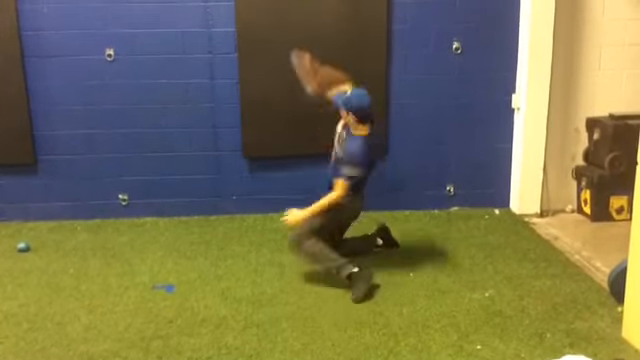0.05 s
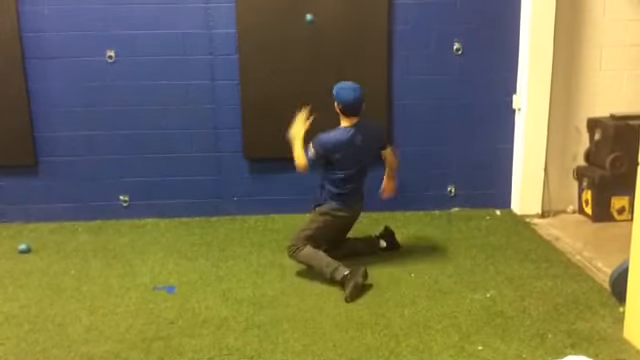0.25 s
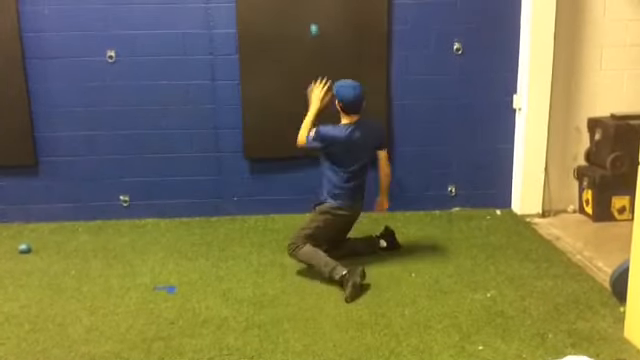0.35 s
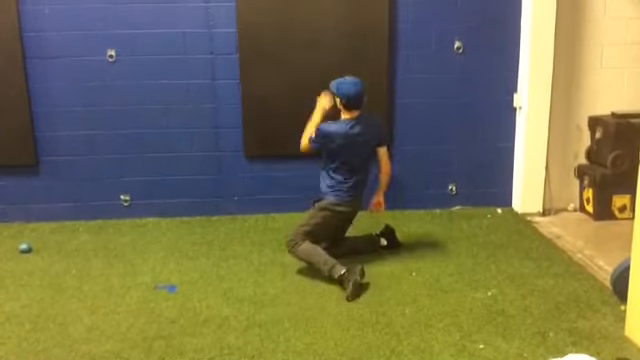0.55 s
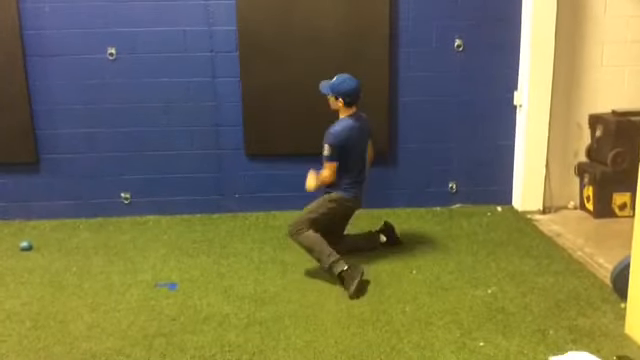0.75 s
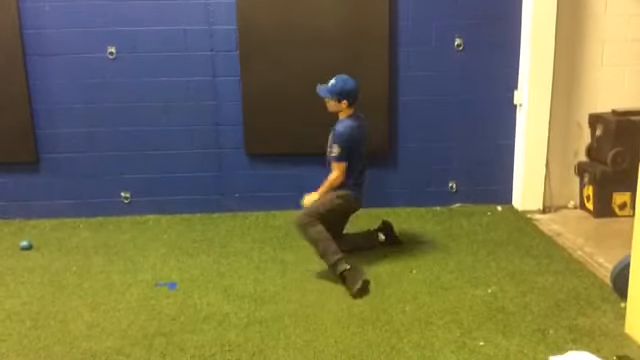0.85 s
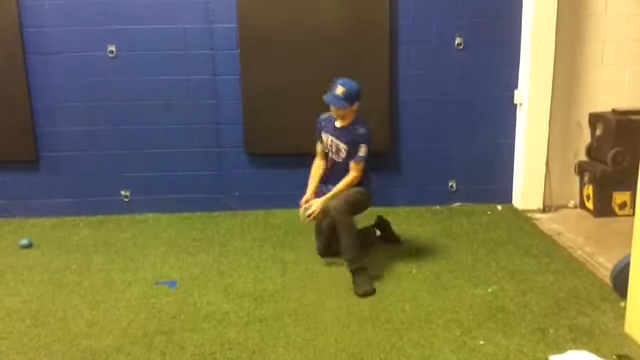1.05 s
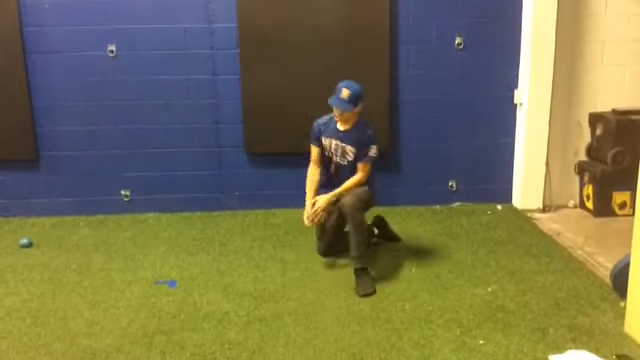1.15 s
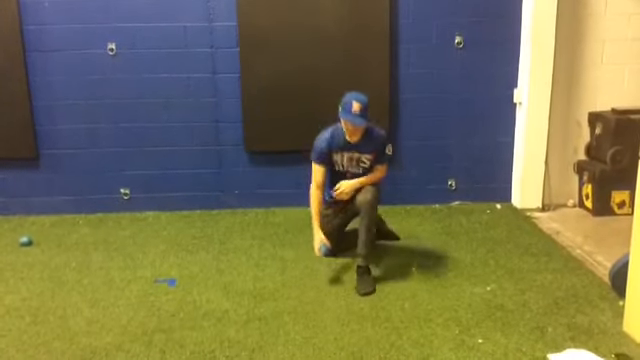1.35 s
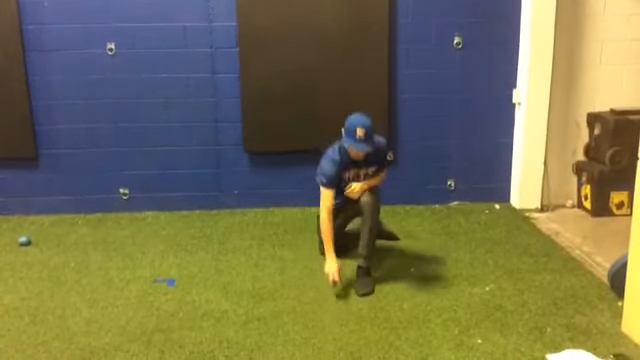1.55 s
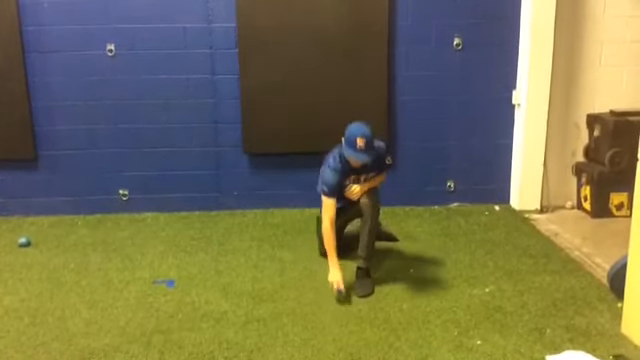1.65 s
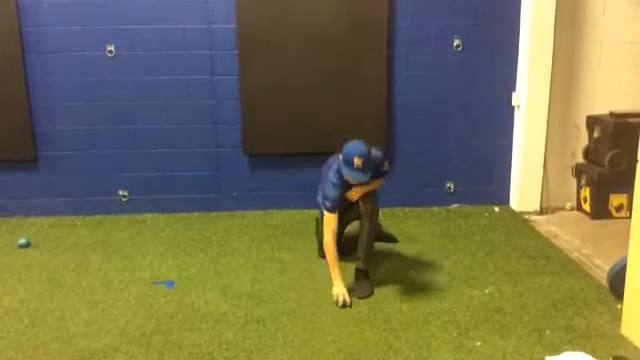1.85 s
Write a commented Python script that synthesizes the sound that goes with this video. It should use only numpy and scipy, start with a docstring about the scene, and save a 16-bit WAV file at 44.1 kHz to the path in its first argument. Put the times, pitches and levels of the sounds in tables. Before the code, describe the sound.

One sharp thud of a ball against a wall pad booms and dies away in an echoing training hall. Around it, the thrower's clothes rustle faintly and scuff on turf, with a small click over quiet ventilation rumble.

```python
"""Weighted ball against a wall pad

A thrown ball strikes a wall pad in an indoor training hall: the cover cracks, the pad's damped modes
thud, and the hall's standing waves boom. The crack reflects from the near walls, flutters along the
hall's length and dies away as reverberation. The kneeling thrower's clothes rustle and scuff on the
turf, with a few light clicks and faint squeaks, over a low ventilation rumble."""
import sys
import numpy as np
from scipy import signal
from scipy.fft import rfft, irfft
from scipy.io import wavfile
from scipy.ndimage import uniform_filter1d

SR = 44100
rng = np.random.default_rng(int(sys.argv[2]) if len(sys.argv) > 2 else 0)


def bounce(signal):
    """Save signal as a 16-bit WAV file at the path given by the first command-line argument."""
    frames = np.transpose(np.atleast_2d(signal))
    limited = np.clip(frames, -1, 1)
    pcm = np.round(limited * 32767).astype(np.int16)
    wavfile.write(sys.argv[1], SR, pcm)


N = 83790
TIME_S = np.arange(N) / SR


def gain(db):
    """Amplitude ratio of a level in decibels."""
    return 10 ** (np.asarray(db) / 20)


def unit_rms(x):
    """Normalisation to an rms of 1."""
    return x / np.sqrt(np.mean(x ** 2))


def decay(t60_s):
    """Exponential damping: 60 dB in t60_s."""
    return gain(-60 * TIME_S / t60_s)


def rise(time_constant_s):
    """First-order build-up towards 1."""
    return 1 - np.exp(-TIME_S / time_constant_s)


def delay(x, delay_s):
    """Pure time delay."""
    return np.concatenate([np.zeros(int(delay_s * SR)), x])[:N]


def per_bin(hz, values):
    """Interpolation over log frequency, one value per spectral bin."""
    return np.interp(np.log(np.arange(N // 2 + 1) * SR / N + 1), np.log(hz), values)


def response(spectrum):
    """Magnitude response through (frequency_hz, level_db) points."""
    hz, db = np.array(spectrum).T
    return gain(per_bin(hz, db))


def noise(spectrum):
    """Spectrally shaped white noise, at an rms of 1."""
    return unit_rms(irfft(rfft(rng.standard_normal(N)) * response(spectrum), N))


def band(x, hz, spread):
    """Band-pass filtering from hz / spread to hz * spread."""
    return signal.sosfilt(signal.butter(2, [hz / spread, hz * spread], "band", fs=SR, output="sos"), x)


def band_noise(hz, spread):
    """Band-limited noise, at an rms of 1."""
    return unit_rms(band(rng.standard_normal(N), hz, spread))


def swells(rows, spread):
    """Noise bands under Gaussian envelopes; width_s is the standard deviation."""
    return sum(gain(db) * np.exp(-.5 * ((TIME_S - peak_s) / width_s) ** 2) * band_noise(hz, spread)
               for peak_s, width_s, db, hz in rows)


def ring(modes):
    """Free vibration as a superposition of damped sinusoids."""
    return sum(gain(db) * decay(t60_s) * np.sin(2 * np.pi * hz * TIME_S) for hz, db, t60_s in modes)


# Ventilation and room tone: frequency_hz, relative_density_db
VENTILATION_SPECTRUM = [(25, -18), (70, -7), (125, 0), (180, -5), (250, -5), (295, -16.5), (365, -9.5),
                        (480, -20), (620, -26), (1400, -28.5), (2000, -25), (2700, -35), (3600, -25),
                        (4800, -37), (9500, -36), (16000, -56)]
def ventilation():
    """Stationary noise: moving air rumbles, with most of its power at low frequencies."""
    return gain(-57) * noise(VENTILATION_SPECTRUM)


# Rubs of cloth and turf: peak_s, width_s, relative_level_db, centre_hz
RUBS = [(.092, 0.042, -55, 1390), (.11, 0.27, -61.5, 3500), (.19, .01, -51, 2040), (.15, .08, -64.5, 8790),
        (.61, .012, -71, 7000), (1.03, .14, -66.5, 5560), (1.17, 0.039, -58.5, 690),
        (1.095, 0.0053, -56.5, 1190), (1.168, .004, -56.5, 1310), (1.191, .003, -57.5, 1080),
        (1.22, 0.02, -59.5, 1800), (1.295, 0.013, -58.5, 2150), (1.32, 0.032, -60, 4635)]
def rustle():
    """Friction noise: sliding cloth sounds in small grains, a random modulation of the level."""
    grain_db = 1.6 * unit_rms(uniform_filter1d(rng.standard_normal(N), size=260))
    return gain(grain_db - 4) * swells(RUBS, spread=2.1)


# Swishes of the throwing arm: peak_s, width_s, relative_level_db, centre_hz
ARM_SWISHES = [(.188, .011, -43.5, 262), (.233, 0.0065, -23.5, 265)]
def arm_swish():
    """Low band-limited noise: the arm swishes dully just before the impact."""
    return band(swells(ARM_SWISHES, spread=1.45), hz=250, spread=2.18)


# Crack of the cover: frequency_hz, relative_density_db
CRACK_SPECTRUM = [(60, -15), (600, -9.5), (1900, 2.5), (2700, -40.5), (3600, 8), (5000, -7), (7000, -14),
                  (8500, -3), (10000, -13.5), (12800, -14.5), (16000, -30.5)]
def cover_crack():
    """Impulsive excitation: a minimum-phase pulse and a brief noise burst share one broad spectrum."""
    cepstrum = irfft(np.log(response(CRACK_SPECTRUM)), N)
    pulse = irfft(np.exp(rfft(2 * cepstrum[:N // 2], N)), N)  # the causal half gives minimum phase
    snap = -pulse / np.linalg.norm(pulse)
    burst = noise(CRACK_SPECTRUM) * decay(t60_s=.007)
    return gain(1) * snap + gain(-9) * burst


# Modes of the pad under the ball: pitch_hz, level_db, t60_s
THUD_MODES = [(185.3, -4.5, 0.15), (346.6, -10.5, 0.14), (371.5, -2.5, 0.077), (664, -8.5, 0.04),
              (815.5, -17.5, 0.12), (1043, -18.5, 0.037), (1234, -20.5, 0.032), (1684, -25, 0.041),
              (1982, -12.5, 0.018)]
def pad_thud():
    """Damped modal vibration: the struck pad loses its energy within a few tens of cycles."""
    return ring(THUD_MODES) * rise(.0024)


# Low standing waves of the hall: pitch_hz, level_db, t60_s
BOOM_MODES = [(127.5, -24, 1.18), (141.3, -27, 1.57), (147.6, -27, 1.41), (160.5, -17, 1.7),
              (169.3, -29, 1.1), (177.4, -8, 0.73), (181.8, -27, 1.2), (190.7, -22, 1.38),
              (195.5, -14, 1.66), (196.3, -26, 1.36), (209.3, -30, 1.13), (214.6, -30, 1.19),
              (311.9, -28, 1.26), (322.1, -6, 0.22), (351.6, -38, 1.13), (390.2, -34, 1.19),
              (419.9, -32, 0.87)]
# Faint higher resonances of the hall: pitch_hz, level_db, t60_s
UPPER_MODES = [(685, -40, .8), (888, -51, .7), (1068, -49, 0.99), (1290, -47, 1), (1583, -52, 1),
               (1793, -47, 0.81), (2089, -57, 0.95)]
def hall_resonance():
    """Standing waves build up after the impact; those close in frequency beat against each other."""
    return ring(BOOM_MODES) * rise(.038) + ring(UPPER_MODES) * rise(.005)


# Diffuse field of the hall: frequency_hz, relative_density_db, t60_s
REVERB_BANDS = [(37.5, -17, 1.1), (84, -15, 2.6), (184, -8.5, 0.52), (264.3, -5.5, 1.2), (353, -4.5, 1.1),
                (420, -6, 1.165), (514, -13, .8), (694, -6, 0.51), (1220, -13.5, .62), (2000, -22, .6),
                (2763, -22.5, 0.29), (4000, -19, .48), (5060, -27, 0.35), (9100, -30, .35),
                (12000, -34.5, 0.19), (16000, -50.5, .2)]
# Slow late tail: frequency_hz, relative_density_db
TAIL_SPECTRUM = [(300, 1), (700, 1), (1400, -9), (2100, -13.5), (2700, -20.5), (3700, -7), (4800, -25),
                 (10000, -41.5)]
def reverberation():
    """Diffuse-field decay: each band dies at its own rate, over a faint, slow tail."""
    hz, db, t60s = np.array(REVERB_BANDS).T
    spectrum = rfft(noise(np.column_stack([hz, db])))
    diffuse = sum(irfft(spectrum * per_bin(hz, weights), N) * decay(t60_s)
                  for weights, t60_s in zip(np.eye(len(hz)), t60s))
    tail = noise(TAIL_SPECTRUM) * decay(t60_s=2.14)
    return gain(-24.5) * rise(.005) * diffuse + gain(-49) * tail


# Returns of the crack from near surfaces: delay_s, gain_db
NEAR_REFLECTIONS = [(0.019, -15), (0.0576, -11), (0.0609, -10.5), (.071, -19.5), (.092, -22)]
def crack_echoes(crack):
    """Early reflections: near surfaces return delayed copies of the crack's treble."""
    treble = signal.sosfilt(signal.butter(1, [3000, 9000], "band", fs=SR, output="sos"), crack)
    return sum(gain(db) * delay(treble, delay_s) for delay_s, db in NEAR_REFLECTIONS)


# Returns of the thud from the far walls: delay_s, low_note_db, high_note_db
FAR_REFLECTIONS = [(0.0551, -2.5, -32), (0.1217, -2, -22.5), (0.153, 0.5, -14), (0.1994, -25, -23),
                   (0.2916, -10.5, -29), (0.3678, -12, -38), (0.5156, -11.5, -43), (0.6139, -23, -38.5),
                   (0.7519, -23, -51)]
def thud_echoes():
    """Discrete reflections: the thud rolls back from the far walls as two damped low notes."""
    envelope = decay(t60_s=.11) * rise(.0058) ** 2
    low, high = (envelope * np.sin(2 * np.pi * hz * TIME_S) for hz in (180.5, 396.8))
    return sum(delay(gain(low_db) * low + gain(high_db) * high, delay_s)
               for delay_s, low_db, high_db in FAR_REFLECTIONS)


# Colouring of the flutter echo: frequency_hz, gain_db
FLUTTER_RESPONSE = [(500, -2.5), (1600, 2), (2600, -0.5), (3700, -0.5), (4800, -8.5), (12000, -24)]
def flutter_echo(crack, round_trip_s=.1455, first_db=-23, loss_db=6):
    """Repeated reflection: the crack runs the hall's length and back, scattered and weaker each trip."""
    coloured = rfft(crack) * response(FLUTTER_RESPONSE)
    echoes = np.zeros(N)
    for trip in range(4):
        scatter = rng.standard_normal(N) * decay(t60_s=.055)
        echo = irfft(coloured * rfft(scatter / np.linalg.norm(scatter)), N)
        echoes += gain(first_db - trip * loss_db) * delay(echo, (trip + 1) * round_trip_s)
    return echoes


# Light clicks: start_s, level_db, centre_hz
CLICKS = [(0.4848, -56, 7020), (1.288, -58, 10900), (1.2948, -40, 7600)]
def clicks():
    """Transients: a broadband edge and a fast-decaying noise band, with a weak reverberant tail."""
    envelope = decay(t60_s=.0072) + gain(-36.5) * decay(t60_s=.2)
    edge = gain(-15) * decay(t60_s=.006) * rng.standard_normal(N)
    return sum(gain(db) * delay(edge + envelope * band_noise(hz, spread=1.19), start_s)
               for start_s, db, hz in CLICKS)


# Faint squeaks: peak_s, width_s, level_db, pitch_hz
THIN_SQUEAKS = [(1.39, 0.067, -69.5, 2890), (1.53, 0.062, -74, 2890), (1.38, .04, -70.5, 3600),
                (1.547, 0.077, -70.5, 3540)]
def squeaks():
    """Narrow-band noise is heard as a thin, wavering pitch."""
    return swells(THIN_SQUEAKS, spread=1.03)


def scene(impact_s=.2388):
    """Linear superposition of the sources and the hall's response at one point."""
    crack = cover_crack()
    hall = hall_resonance() + reverberation() + crack_echoes(crack) + thud_echoes() + flutter_echo(crack)
    impact = delay(crack + pad_thud() + hall, impact_s)
    return (ventilation() + rustle() + arm_swish() + impact + clicks() + squeaks())[None]


def record(dry, drive=.29, cutoff_hz=16400):
    """Soft saturation rounds the loudest peaks; a low-pass filter limits the bandwidth."""
    saturated = np.tanh(drive * dry) / drive
    return signal.sosfilt(signal.ellip(8, .2, 70, cutoff_hz, fs=SR, output="sos"), saturated)


dry = scene()
out = record(dry)
bounce(out)
```